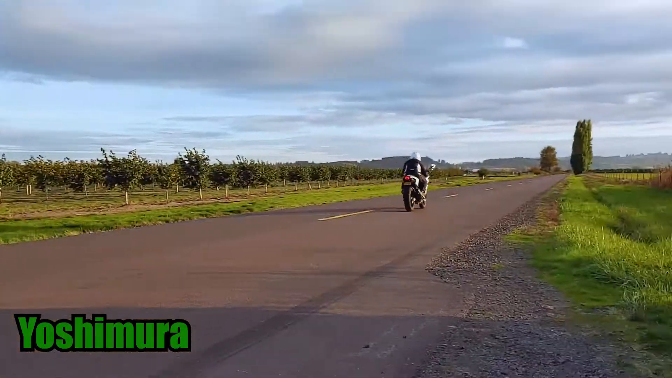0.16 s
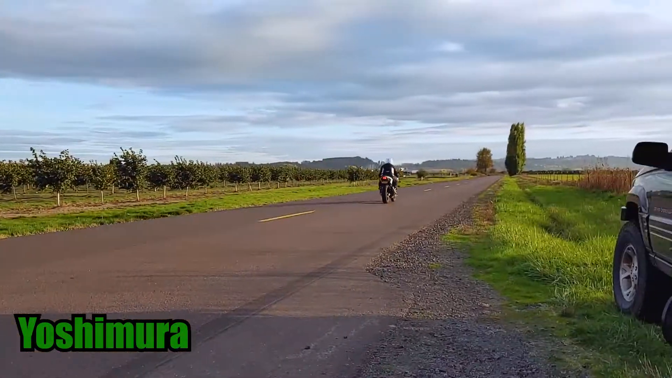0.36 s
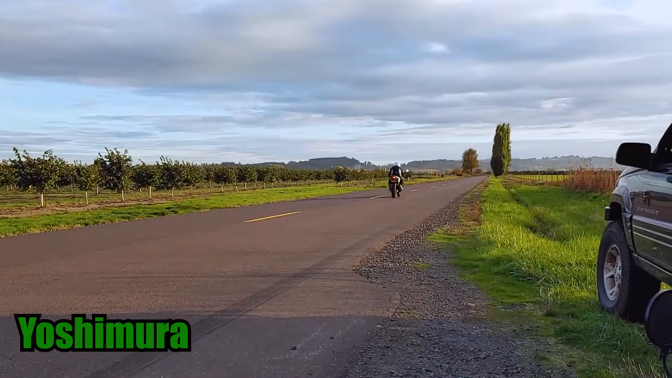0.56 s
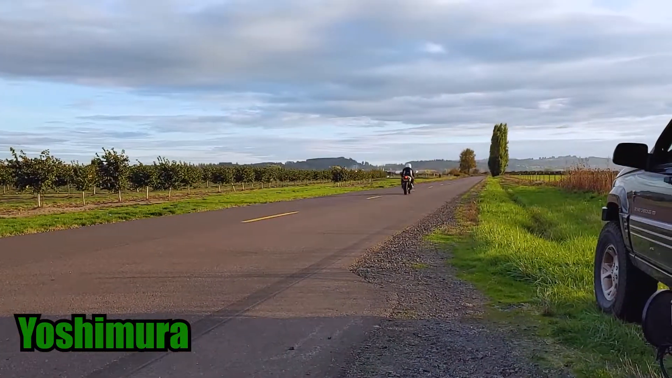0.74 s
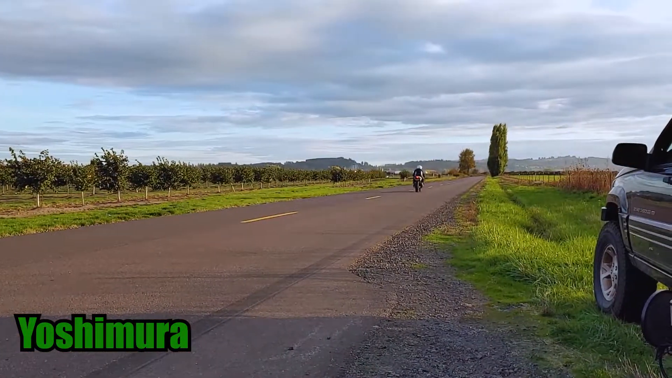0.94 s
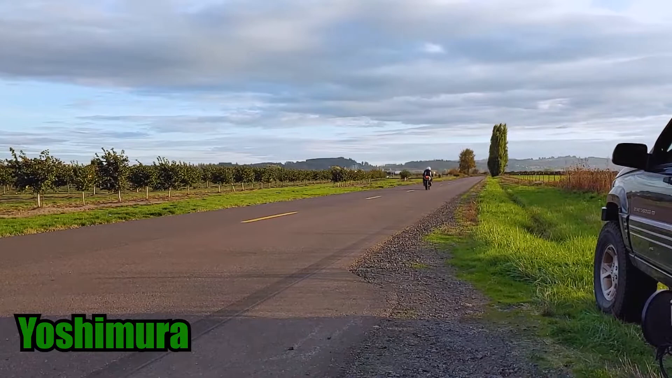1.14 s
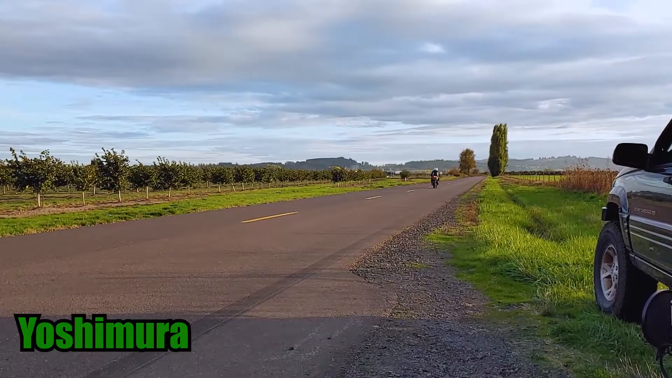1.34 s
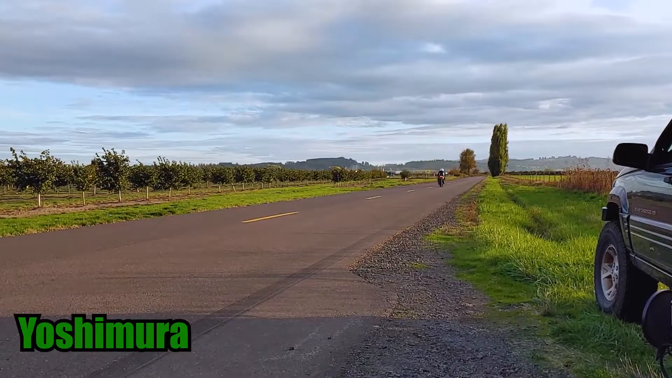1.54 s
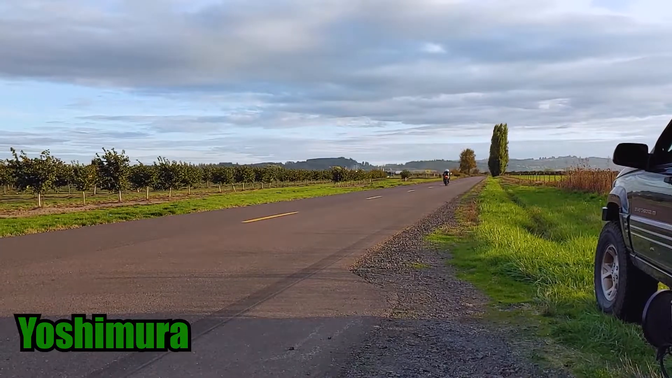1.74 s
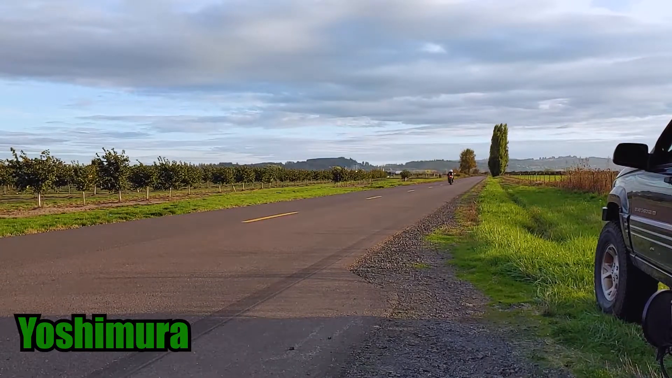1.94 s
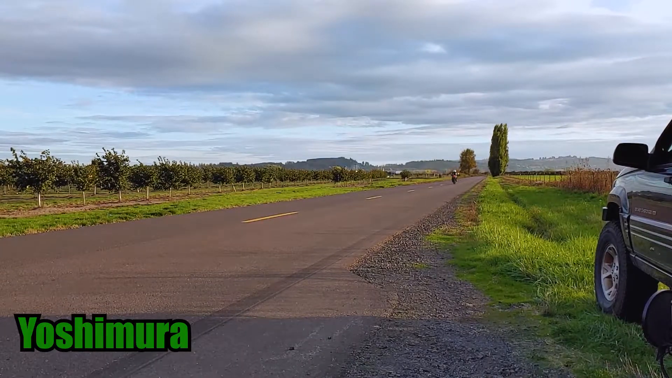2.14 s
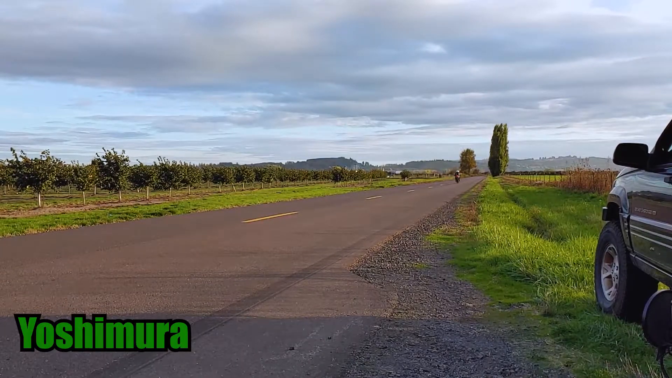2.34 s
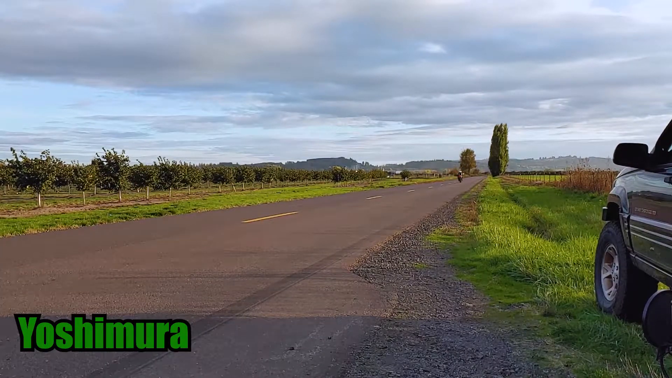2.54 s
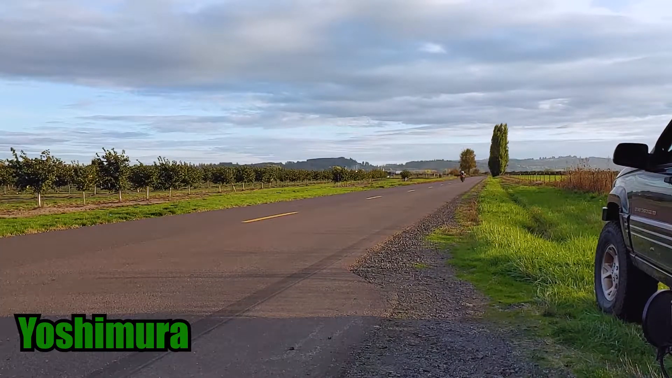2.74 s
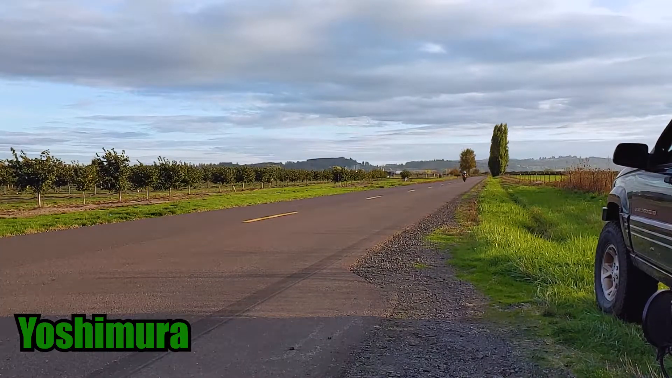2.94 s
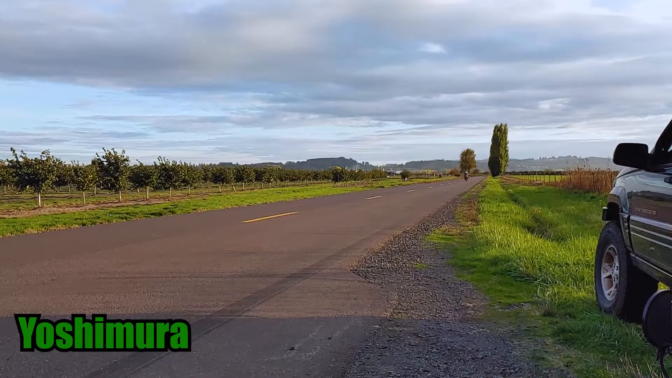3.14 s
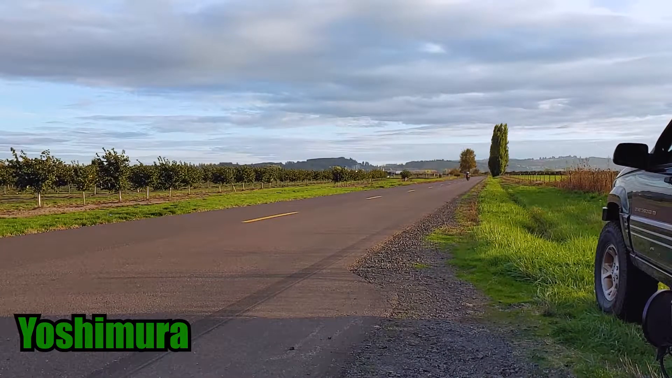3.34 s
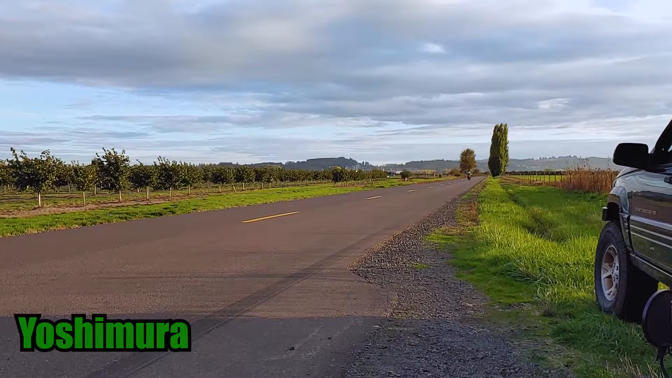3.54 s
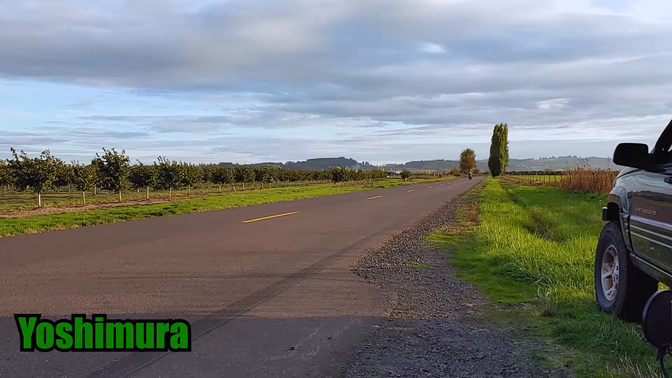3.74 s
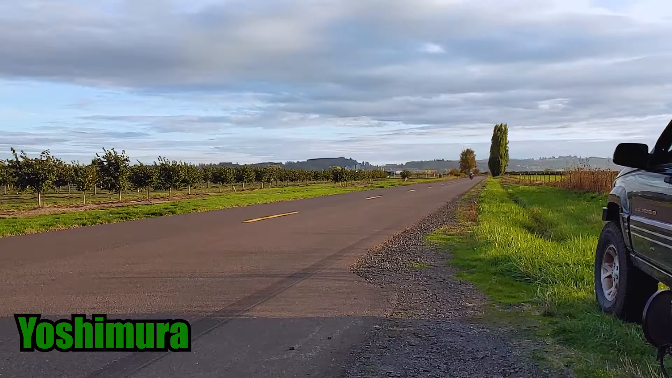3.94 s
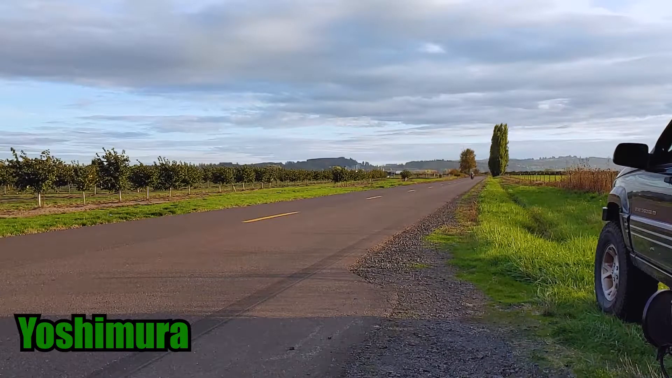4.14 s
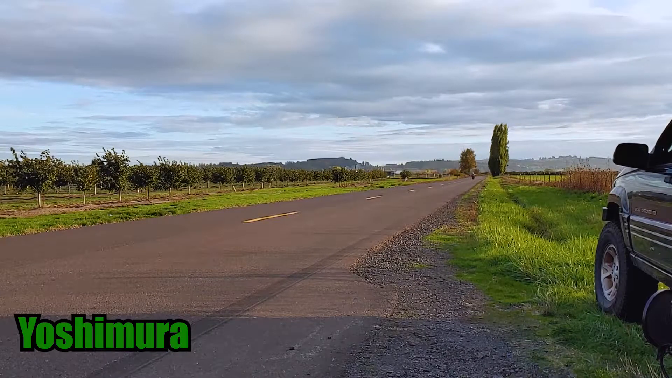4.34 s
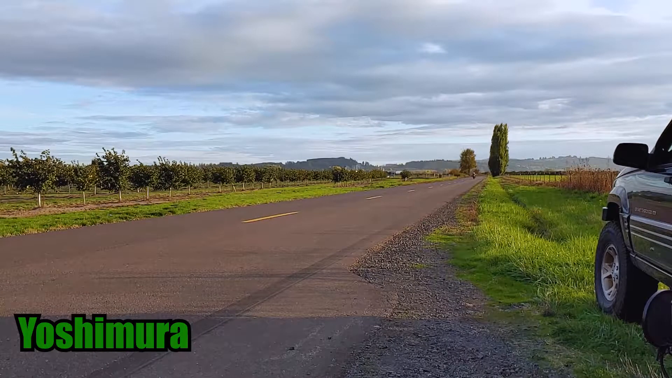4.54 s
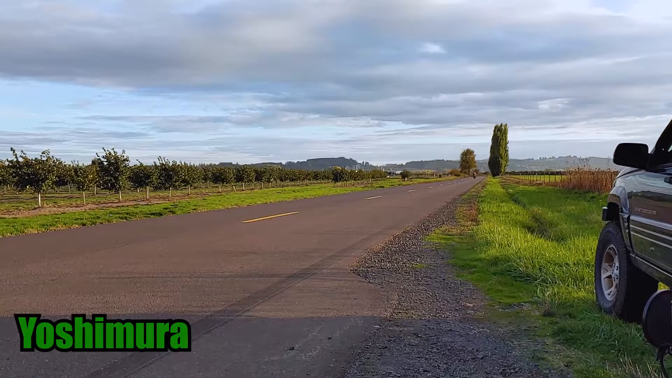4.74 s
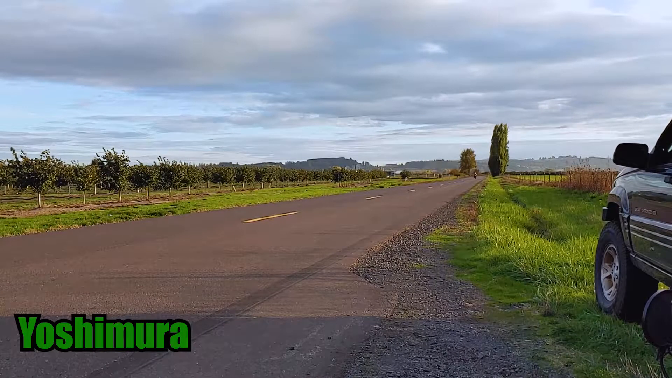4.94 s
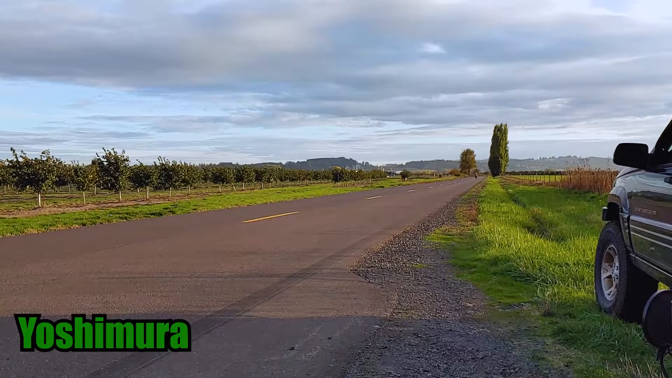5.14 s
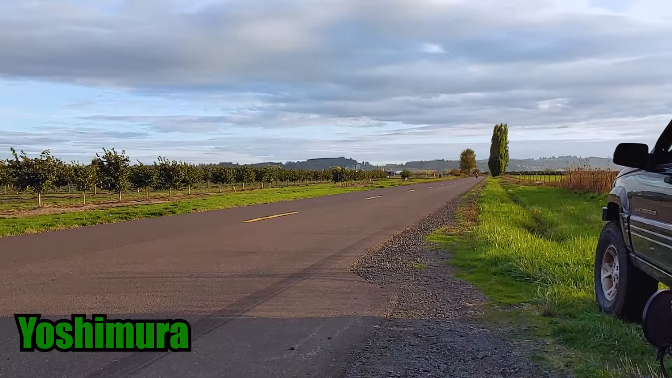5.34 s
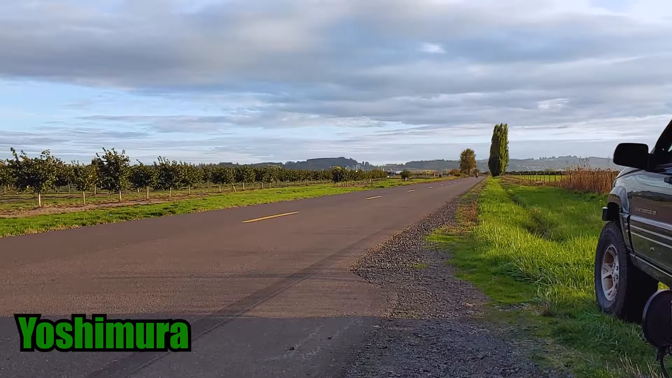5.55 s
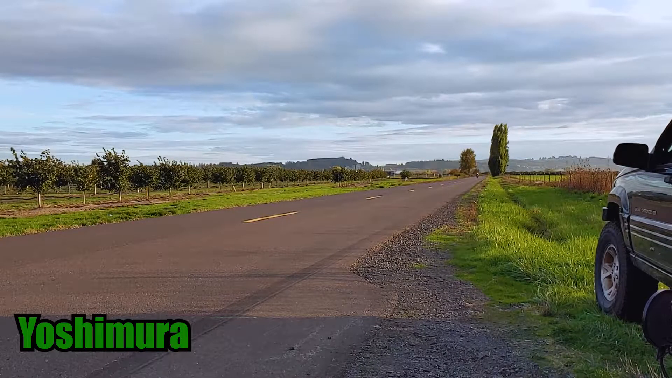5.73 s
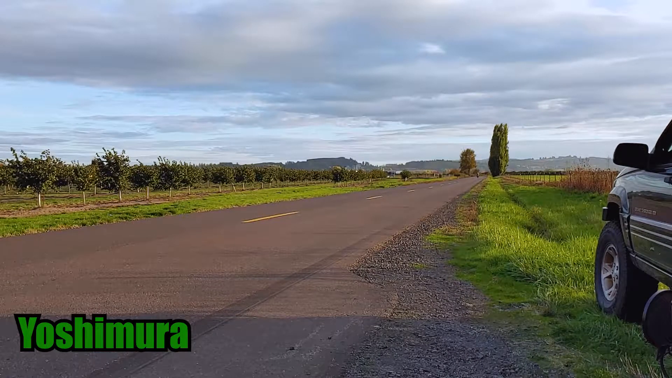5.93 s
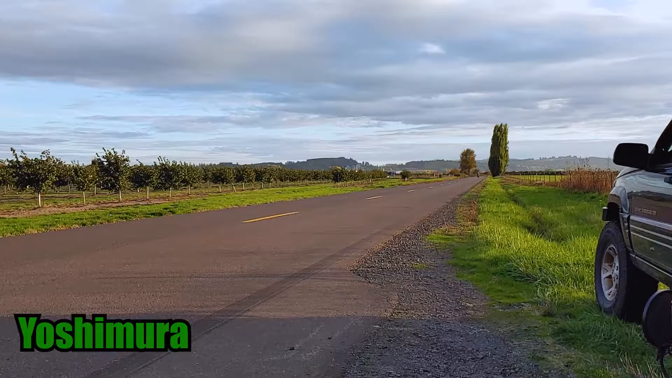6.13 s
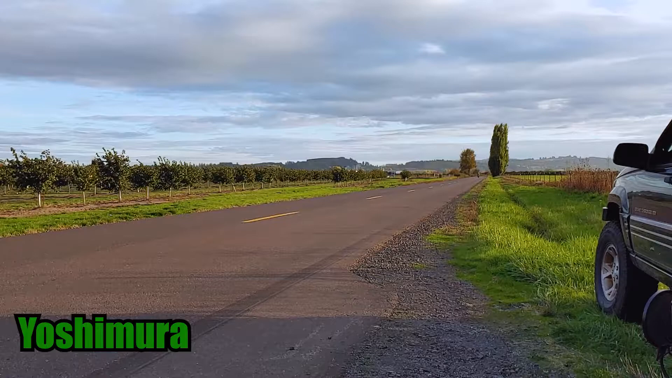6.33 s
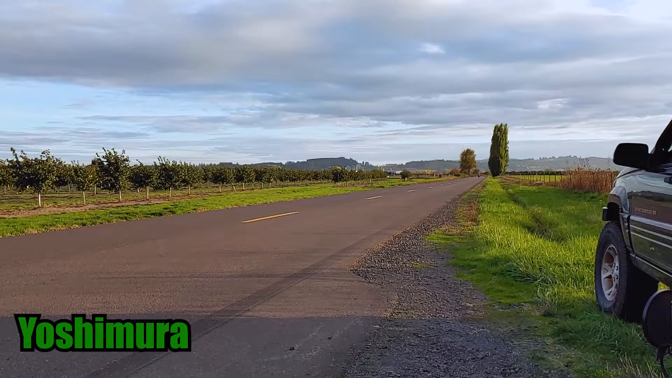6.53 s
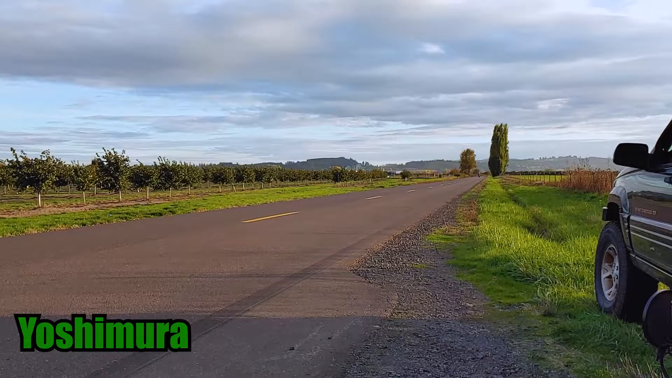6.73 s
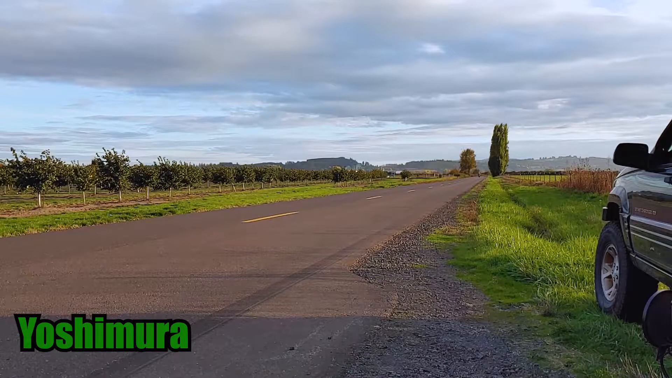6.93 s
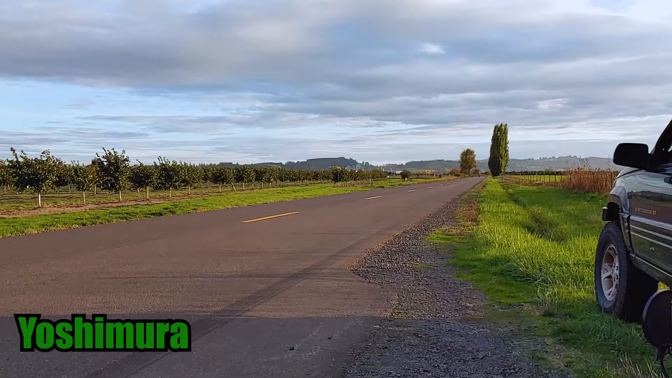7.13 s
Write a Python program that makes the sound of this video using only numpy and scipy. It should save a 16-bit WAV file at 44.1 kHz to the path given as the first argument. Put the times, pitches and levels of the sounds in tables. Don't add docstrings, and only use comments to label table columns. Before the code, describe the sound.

Outdoors on a flat rural road, a motorcycle with a free-flowing exhaust pulls hard away from close to the microphone. Its raspy roar climbs steadily in pitch while growing quieter and duller. Just after three seconds it shifts up with a brief cut and pop, continues lower and distant, then shuts off and coasts. Low wind buffets rumble on the microphone over a soft open-country murmur.

```python
import sys
import numpy as np
from scipy import signal
from scipy.io import wavfile
from scipy.ndimage import uniform_filter1d

SR = 44100
rng = np.random.default_rng(int(sys.argv[2]) if len(sys.argv) > 2 else 0)


def voltage_ratio(level):
    return 10 ** (np.asarray(level, float) / 20)


def master_out(mix):
    frames = np.transpose(np.atleast_2d(mix))
    ceiling = np.clip(frames, -1, 1)
    pcm = np.round(ceiling * 32767).astype(np.int16)
    wavfile.write(sys.argv[1], SR, pcm)


N = 316765


def level(x):
    return x / np.sqrt(np.mean(x ** 2))


def curve(table):
    s, *columns = np.transpose(table)
    return [np.interp(np.arange(N) / SR, s, c) for c in columns]


def colour(table, hz):
    f, db = np.transpose(table)
    return np.interp(np.log(hz), np.log(f), db)


def band(x, hz, octaves):
    edges_hz = hz * 2 ** (np.array([-.5, .5]) * octaves)
    sos = signal.butter(2, np.minimum(edges_hz, .45 * SR), "band", fs=SR, output="sos")
    return signal.sosfilt(sos, x)


def walk(rate_hz):
    steps = signal.resample(rng.standard_normal(int(rate_hz * N / SR) + 2), 800)
    return np.interp(np.linspace(0, 799, N), np.arange(800), steps)


def per_cycle(cycles):
    return np.interp(cycles, np.arange(600), rng.standard_normal(600))


def murmur():
    # frequency in Hz, level in dB per Hz.
    murmur_spectrum = [(35, -31), (60, 6.5), (153, -3.5), (201, -10.5), (253, -1), (340, -14), (399, -7.5),
                       (447, -8), (644, -9.5), (790, -29), (1430, -20.5), (4080, -37), (5620, -47.5),
                       (14000, -64)]
    out = 0
    for hz in 70 * 2 ** np.arange(0, 7.7, 1 / 3):
        db = colour(murmur_spectrum, hz) + 10 * np.log10(hz) + 1.2 * walk(5)
        out = out + voltage_ratio(db) * level(band(rng.standard_normal(N), hz, 1 / 3))
    return voltage_ratio(-55) * level(out)


def insects():
    # time in seconds, level in dB.
    chirr_level = [
        (5.9, -96),
        (6.3, -76),
        (6.7, -76.5),
        (7.18, -82),
    ]
    chirr = 0
    for hz in (4050., 4350.):
        chirr = chirr + voltage_ratio(3 * walk(13)) * level(band(rng.standard_normal(N), hz, .05))
    return voltage_ratio(curve(chirr_level)[0]) * chirr


def wind():
    # peak time in seconds, peak level in dB, rise in seconds, fall in seconds.
    gust_table = [
        (0.02, -41, .02, .05),
        (1.5, -61, .08, .08),
        (2.7, -61.5, .2, .12),
        (3.89, -33.5, 0.048, 0.037),
        (4.04, -39, 0.21, .08),
        (4.4, -49, 0.16, .35),
        (5.18, -45, .07, 0.11),
        (5.72, -52, .1, 0.039),
        (5.92, -60, .08, 0.061),
        (6.72, -58, .03, .14),
    ]
    t = np.arange(N) / SR
    gain = voltage_ratio(-72 + 3 * walk(6))
    for s, db, rise_s, fall_s in gust_table:
        gain = gain + voltage_ratio(db) * np.exp(-np.abs(t - s) / np.where(t < s, rise_s, fall_s))
    noise = rng.standard_normal(N)
    return gain * level(band(band(noise, 23., 1.4), 23., 1.4))


def road(x):
    t = np.arange(N) / SR
    lag_s = 0.001234 / (1 + t / 0.37)
    share = 0.51 * np.exp(-(t / 0.96) ** 2)
    dull = signal.lfilter(*signal.butter(1, [1100, 5500], "band", fs=SR), x)
    return (x + share * np.interp(t - lag_s, t, dull)) / np.sqrt(1 + .5 * share ** 2)


def clearings_db(hz):
    # frequency in Hz, lift in dB.
    favoured = [
        (1380, 2),
        (2700, 1),
    ]
    # centre time in seconds, half length in seconds, frequency in Hz, lift in dB.
    passing = [(.2, 0.32, 1280, 9.5), (.78, 0.23, 1300, 6), (1.75, 0.13, 1200, 4.5), (2.25, 0.059, 3600, 6),
               (2.85, 0.3, 2700, 10), (2.68, 0.083, 2000, 1.5), (3.2, 0.13, 2300, 3.5),
               (3.9, 0.72, 2370, 3.5), (4.25, 0.12, 1610, 8.5), (4.75, 0.3, 1540, 6), (4.6, 0.28, 2480, 1),
               (6.4, 1, 1374, 6.5), (0.32, 0.47, 880, 8.5), (1.45, .25, 8600, 4), (1.42, 0.71, 1000, 3),
               (1.8, 0.45, 3700, 2.5), (2.3, 0.24, 820, 6.5), (2.88, 0.31, 5600, 7.5),
               (3.35, 0.071, 1450, 3.5), (5.204, 0.16, 1050, 6), (5.15, 0.084, 2070, 2),
               (0.49, 0.15, 1900, 4.5), (5.6, 0.28, 1100, 7)]
    t = np.arange(N) / SR

    def near(centre_hz):
        return np.exp(-(np.log2(hz / centre_hz) / 0.28) ** 2)

    lift_db = sum(db * near(f) for f, db in favoured)
    for s, half_s, f, db in passing:
        lift_db = lift_db + db * near(f) * np.exp(-((t - s) / half_s) ** 2)
    return lift_db


def gas(cycles, gas_db, treble_db, throttle):
    # frequency in Hz, level in dB per Hz.
    gas_spectrum = [(290, -32), (500, 6), (629, -1.5), (747, -18), (1120, -17), (1410, -18), (1620, -15),
                    (3950, -17), (5740, -24), (11400, -22), (15400, -27.5)]
    rush, size_db, slope = 0.38, 2.0, 1.42
    edge_db, edge_tilt_db_per_octave = -2.5, -3.5
    place = (cycles + .55) % 1 - .5
    common = per_cycle(cycles)
    spike = np.exp(-((place + .002 * per_cycle(cycles)) / .004) ** 2)
    edge = level(spike * voltage_ratio(2 * common)) * throttle
    puff = np.exp(-(place / .1) ** 2) * voltage_ratio(size_db * common)
    loss_db = treble_db - gas_db - (colour(gas_spectrum, 7750) - colour(gas_spectrum, 2000))
    out = 0
    for hz in 750 * 2 ** np.arange(0, 4.5, 1 / 3):
        crack = puff * voltage_ratio(size_db * per_cycle(cycles))
        gate = rush + crack * (0.14 + 0.53 * throttle) * min(1, (4000 / hz) ** 1.6)
        gate = gate / np.sqrt(uniform_filter1d(gate ** 2, 12000))
        shock = voltage_ratio(edge_db + edge_tilt_db_per_octave * np.log2(hz / 1000)) * edge
        push = gate * rng.standard_normal(N) - shock
        db = colour(gas_spectrum, hz) - colour(gas_spectrum, 1535) + 10 * np.log10(hz / 2000) - 9
        db = db + loss_db * max(hz / 7750 - .25, 0) ** slope * 1.5 + walk(4.5)
        db = db + clearings_db(hz)
        out = out + voltage_ratio(gas_db + db) * band(push, hz, 1 / 3) / np.sqrt(.5 * hz / SR)
    return out


def relight():
    # start in seconds, peak level in dB, frequency in Hz, 60 dB decay in seconds.
    pops = [
        (3.343, -27, 260, .035),
    ]
    t, out = np.arange(N) / SR, 0
    for s, db, hz, t60_s in pops:
        age_s = np.maximum(t - s, 0)
        out = out + voltage_ratio(db) * np.sin(2 * np.pi * hz * age_s) * np.exp(-np.log(1000) * age_s / t60_s)
    return out


def coasting_hum(cycles):
    # time in seconds, level in dB.
    hum_level = [
        (5.9, -76),
        (6.15, -55),
        (6.5, -52),
        (6.8, -55),
        (7.18, -58),
    ]
    gain = voltage_ratio(curve(hum_level)[0] + 1.5 * walk(8))
    tone = np.sin(2 * np.pi * (13 * cycles + .06 * walk(14)))
    return gain * tone * (np.arange(N) > 5.9 * SR)


def pipe_lead(k, hz):
    silencer_hz, notch_hz = 65, 210
    if k < 4:
        return (silencer_hz - hz) * .0095 + (k - 1) * (.14 * k - .39)
    return -.4 * np.exp(-np.maximum(k * hz - notch_hz, 0) / 50)


def steady(x):
    return x / np.sqrt(uniform_filter1d(uniform_filter1d(x ** 2, 4000), 4000))


def exhaust(cycles, hz, note_db, bark_db):
    # engine order (multiple of the cycle rate), level in dB.
    side_on = [(1, 3), (2, -2.5), (3, -10), (4, -9), (5, -6), (6, -8.5), (7, -13), (8, -16.5), (9, -16),
               (10, -17), (11, -26), (12, -24), (13, -52), (14, -33.5), (15, -26.5), (16, -26.5)]
    behind = [(1, 0.5), (2, -6), (3, -11), (4, -21), (5, -7), (6, -9), (7, -16.5), (8, -15), (9, -21),
              (10, -24), (11, -28), (12, -33), (13, -34), (14, -39.5), (15, -40), (16, -43)]
    far_off = [(1, 0.5), (2, -4.5), (3, -14), (4, -21.5), (5, -7), (6, -8), (7, -13), (8, -12.5), (9, -17),
               (10, -17), (11, -17), (12, -34), (13, -43), (14, -35), (15, -36), (16, -43)]
    just_shut = [(1, -1), (2, -11), (3, -16), (4, -8), (5, -8), (6, -19), (7, -16.5), (8, -18.5), (9, -17),
                 (10, -34), (11, -21), (12, -40), (13, -34), (14, -44), (15, -41), (16, -27)]
    long_shut = [(1, 7.5), (2, 1.5), (3, 7), (4, -13.5), (5, 4), (6, -3), (7, -6.5), (8, -4.5), (9, -22),
                 (10, -18), (11, -27), (12, -8.5), (13, -15), (14, -35), (15, -58), (16, -38)]
    view_s = [.3, 1.4, 3.18, 3.24, 3.335, 3.35, 5.4, 5.47, 5.6, 5.75]
    t = np.arange(N) / SR
    sharp, early = per_cycle(cycles), per_cycle(cycles)
    coasting = np.clip((t - 5.5) / .2, 0, 1)
    note_db, bark_db = uniform_filter1d(note_db, 1300), uniform_filter1d(bark_db, 1300)
    low, high = 0, 0
    for (k, side), (_, back), (_, far), (_, lift), (_, shut) in zip(side_on, behind, far_off, just_shut, long_shut):
        db = np.interp(t, view_s, [side, back, back, lift, lift, far, far, lift, lift, shut])
        if k == 4:
            db = db + 3 - 7 * np.exp(-((k * hz - 231) / 11) ** 2) * (1 - coasting)
        if k == 13:
            db = db - 20 * np.clip((t - 5.9) / .2, 0, 1)
        rough = min(k / 8, 1.2) ** 2
        db = db + rough * (1.8 * sharp + 1.8 * per_cycle(cycles))
        db = db + (0.2267 * min(k, 10) + 0.97 * coasting) * walk(9)
        slip = coasting * rng.uniform(-.5, .5) + pipe_lead(k, hz)
        slip = slip + rough * (.007 * k * early + .04 * per_cycle(cycles))
        tone = -voltage_ratio(db) * np.cos(2 * np.pi * (k * cycles + slip))
        if k < 4:
            low = low + tone
        else:
            high = high + tone
    return voltage_ratio(note_db) * (steady(low) + voltage_ratio(bark_db) * steady(high))


def scene():
    # time in seconds, engine cycle rate in Hz, exhaust note in dB, all as heard.
    ride = [(0.0, 51.69, -18.5), (0.38, 53.77, -18), (0.82, 56.08, -21), (1.1, 57.71, -22.5),
            (1.8, 61.27, -25.5), (2.5, 64.6, -28), (3.16, 67.17, -29), (3.22, 70.5, -36),
            (3.3, 69.05, -37.5), (3.34, 66.07, -38), (3.36, 63.25, -33), (3.42, 59.78, -31),
            (3.54, 55.33, -33.5), (4.48, 57.9, -35), (5.38, 60, -36.5), (5.5, 56.78, -49.5),
            (5.66, 52, -50.5), (7.18, 47.9, -54)]
    # time in seconds, throttle opening from 0 (shut) to 1 (open).
    throttle_table = [
        (0, 1),
        (3.18, 1),
        (3.22, 0),
        (3.335, 0),
        (3.35, 1),
        (5.37, 1),
        (5.47, 0),
        (7.18, 0),
    ]
    # start in seconds, lift in dB, fall in seconds.
    puffs = [
        (3.247, 7, 0.028),
        (3.32, 7.5, 0.044),
    ]
    start_m, speed_m_s, pull_m_s2, coast_s = 15, 6.8, 14.4, 5.4
    t = np.arange(N) / SR
    hz, note_db = curve(ride)
    throttle, = curve(throttle_table)
    shut = 1 - throttle
    cycles = np.cumsum(hz) / SR + .82
    pulling_s = np.minimum(t, coast_s)
    metres = start_m + speed_m_s * pulling_s + pull_m_s2 * pulling_s ** 2 / 2

    bark_db = -4.5 - 3 * np.exp(-((t - 1.27) / 0.63) ** 2) + 4 * shut * (t > coast_s)
    gas_db = -42 - 1.28 * t + 4.5 * np.exp(-(t / 0.7) ** 2)
    gas_db = gas_db + (-5.5 - 3 * (t > coast_s - .1)) * shut
    for s, db, fall_s in puffs:
        gas_db = gas_db + db * np.exp(-np.maximum(t - s, 0) / fall_s) * (t > s)
    air_db_per_m = 0.1247
    treble_db = gas_db - 9 - air_db_per_m * metres - 2 * shut

    background = murmur() + insects() + wind()
    crack = road(gas(cycles, gas_db, treble_db, throttle))
    bike = crack + relight() + coasting_hum(cycles) + exhaust(cycles, hz, note_db, bark_db)
    return (background + bike)[None]


def low_pass(x):
    return signal.sosfilt(signal.butter(12, 15600, fs=SR, output="sos"), x)


def record(dry):
    return low_pass(dry)


dry = scene()
out = record(dry)
master_out(out)
```